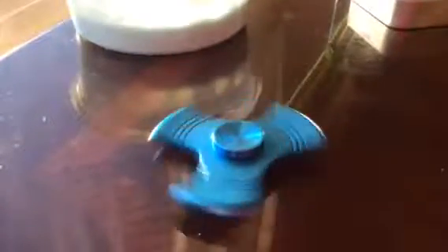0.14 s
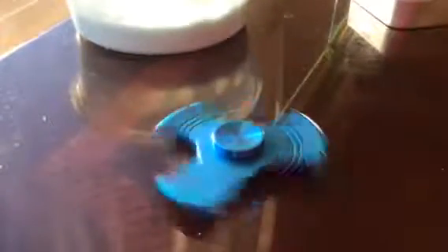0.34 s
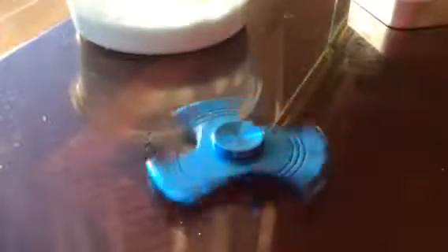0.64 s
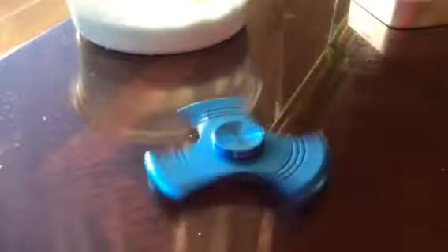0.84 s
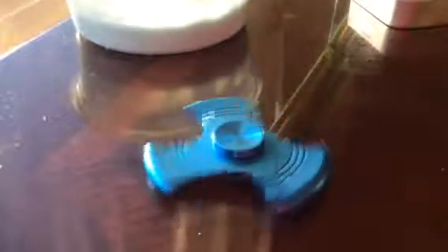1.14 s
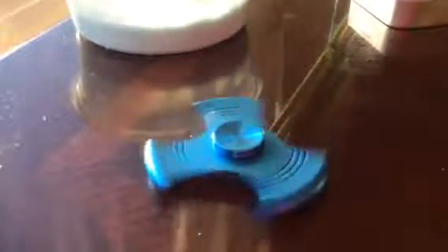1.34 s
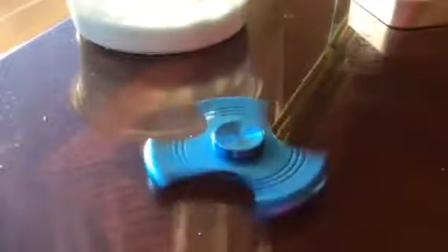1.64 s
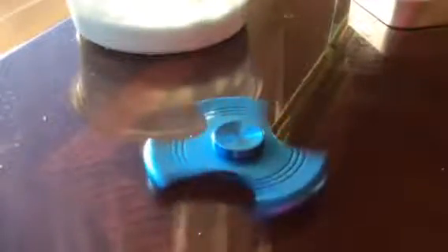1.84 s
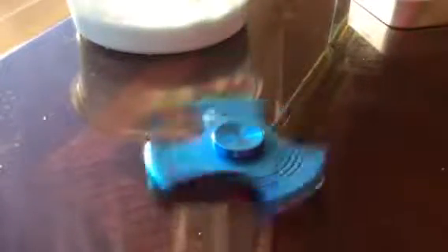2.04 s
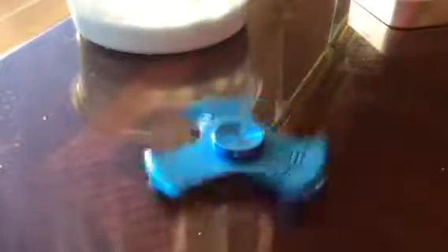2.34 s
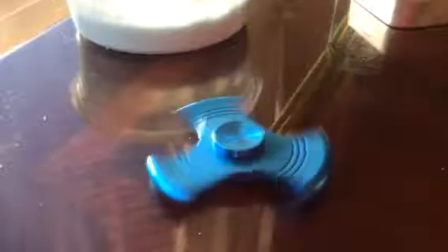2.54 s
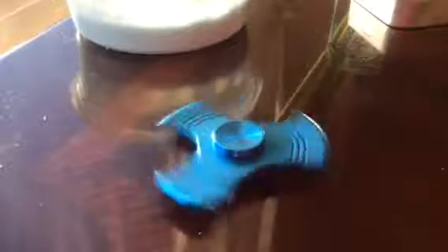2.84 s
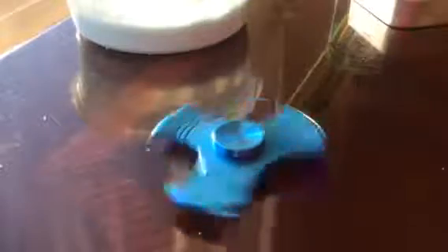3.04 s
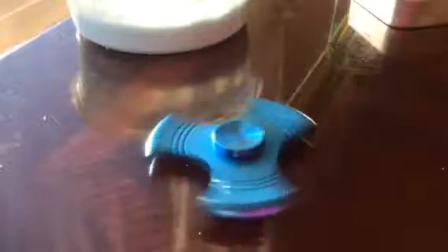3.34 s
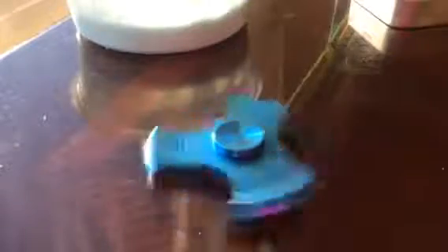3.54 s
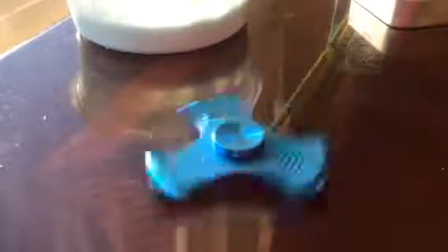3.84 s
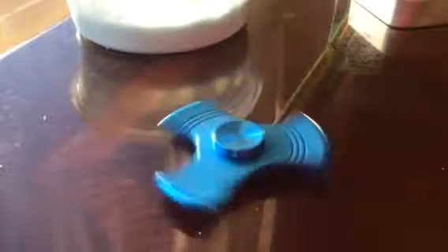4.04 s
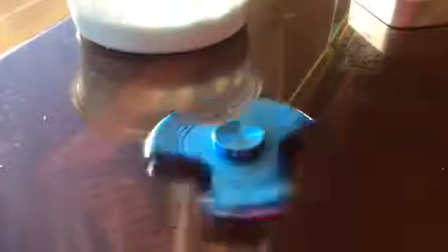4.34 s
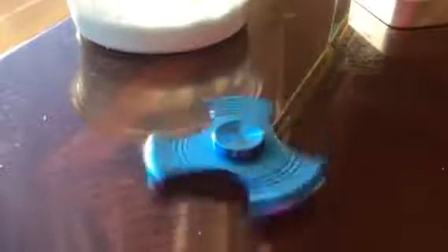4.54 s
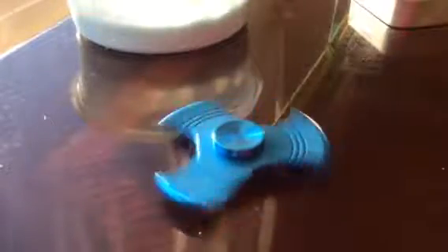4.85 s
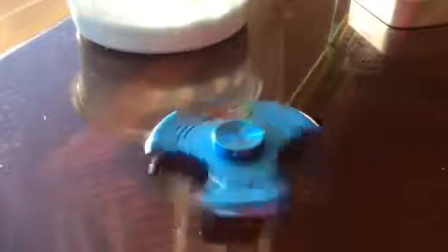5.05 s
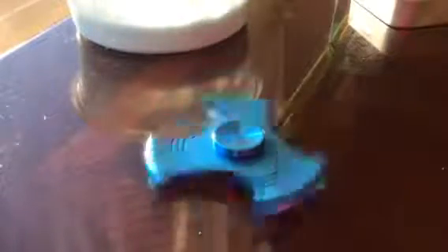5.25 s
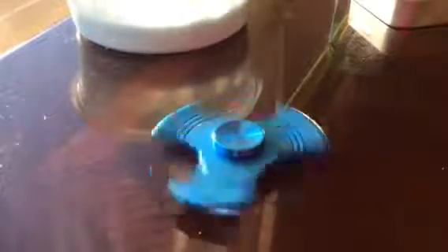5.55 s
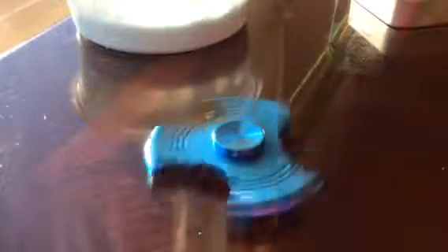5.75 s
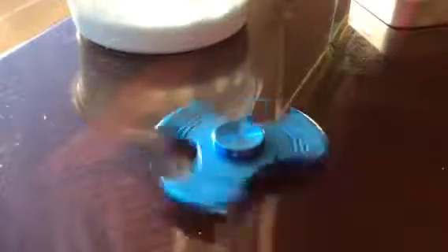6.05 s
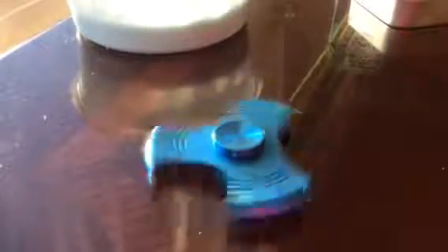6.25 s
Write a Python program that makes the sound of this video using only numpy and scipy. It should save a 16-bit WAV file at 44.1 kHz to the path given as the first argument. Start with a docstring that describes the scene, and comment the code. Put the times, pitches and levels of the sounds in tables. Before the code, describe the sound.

Already spinning from the start, a metal fidget toy rumbles and purrs on a tabletop beside a phone microphone. Rapid soft taps merge into a rough buzzing flutter, varied by wobble, uneven woody knocks and brief tonal hums. Faint metallic hiss and dry specks of grit colour the top. Pitch and level sink very gradually; soft brushing appears near the end. Small quiet indoor room, slight short echo.

```python
"""A three-armed metal fidget spinner coasts on a table, close to a phone in a quiet room.
Random ball contacts drive its resonances: rumble through hub and table top, hiss in the steel races.
The loose rotor wobbles, eases off the balls and knocks: light tips each turn, listed hard blows.
Noise bursts make crunching grit and dust; brief hums, soft rustles and steady room hush lie around it."""
import sys
import numpy as np
from scipy import signal
from scipy.fft import rfft, irfft
from scipy.io import wavfile
from scipy.ndimage import uniform_filter1d, map_coordinates

SR = 44100
rng = np.random.default_rng(int(sys.argv[2]) if len(sys.argv) > 2 else 0)


def pcm_store(signal):
    """Save signal as 16-bit PCM."""
    levels = np.round(np.clip(np.atleast_2d(signal), -1, 1) * 32767)
    wavfile.write(sys.argv[1], SR, levels.astype(np.int16).T)


N = 282181
TAPS = 8192
TIME = np.arange(N) / SR
FREQS = np.arange(TAPS // 2 + 1) * SR / TAPS

# resonances of the spinner standing on the table top: [f/Hz, -6 dB width/Hz, relative level/dB]
BODY_MODES = [(319, 18, -18), (353, 22.3, -14), (381.5, 28, -16), (422, 26, -14), (483.2, 42.6, -10),
              (519.6, 20, -11.5), (580.4, 42, -2.5), (620.3, 71.4, 1), (682, 69, 0.54), (743.7, 59, 1.5),
              (776, 59, -8.5)]
# resonances of steel races and cap: [f/Hz, -6 dB width/Hz, relative level/dB]
STEEL_MODES = [(2467, 190, -8), (2704, 145, -4), (3120, 220, -5.5), (3500, 240, -4), (3977, 350, -7.5),
               (4370, 130, -9.5), (4880, 340, -3.5), (5250, 180, -4), (5850, 200, -2.5), (6100, 150, -6.5),
               (6456, 220, -0.5), (6700, 186, 3), (6944, 490, 0), (7550, 980, -9), (8160, 370, -4.5),
               (9100, 2200, -13), (11700, 4000, -18), (14800, 1800, -19)]
# hard rotor knocks, levels ahead of the play limit; only a negative lull counts:
# [t/s, ring/dB, thud/dB, load lull before it/dB]
HARD_KNOCKS = [(0.096, -36.5, -41, 0), (0.148, -43, -48, -5), (0.179, -45, -49, -10), (0.24, -51, -44.5, 0),
               (0.394, -36.5, -35.5, 0), (0.562, -54, -48, -19), (0.612, -34.5, -41.5, 0),
               (0.636, -48, -48, 0), (0.672, -60, -41.5, 0), (0.785, -39, -64, 0), (0.983, -55, -39.5, 0),
               (1.045, -54, -44, 0), (1.266, -59, -42, 0), (1.547, -37.5, -43, 0), (1.58, -45, -40, 0),
               (1.64, -41, -54, -12), (1.738, -45, -45, 0), (1.895, -35.5, -39.5, 0),
               (1.962, -36, -38.5, -1), (2.027, -38, -40, -5), (2.09, -44, -38.5, 0), (2.101, -39, -64, 2),
               (2.214, -36, -46.5, -1), (2.261, -41, -51, -24), (2.312, -47, -43, -1),
               (2.411, -35.5, -42, -1), (2.446, -38, -56, -2), (2.512, -37, -47, 0),
               (2.543, -37.5, -46, -16), (2.704, -48, -39, -18.5), (2.815, -43, -47, -6),
               (2.868, -42.5, -39, 0), (2.931, -33.5, -37, 0), (3.162, -33.5, -36, -2),
               (3.28, -36.5, -42.5, 0), (3.392, -49, -40, 0), (3.406, -40.5, -58, 0), (3.423, -60, -47, 0),
               (3.456, -39, -40, 0), (3.807, -44, -46, 0), (3.912, -40, -46, -14), (3.926, -35.5, -45, 0),
               (4.022, -35, -53, -8), (4.072, -36.5, -57, 0), (4.157, -43, -45, -9), (4.295, -40, -55, -6),
               (4.478, -37.5, -55, 0), (4.557, -31, -40.5, -6), (4.62, -47, -44, 0), (4.663, -48, -43, 0),
               (4.733, -36, -45, 0), (4.903, -35.5, -39, 0), (4.946, -38, -58, -6), (5.075, -61, -40, 0),
               (5.089, -30, -58, -4.5), (5.139, -43, -46, -7), (5.175, -48, -43, 0), (5.283, -39.5, -55, 0),
               (5.316, -38, -40, -9.5), (5.494, -37.5, -43, -8), (5.729, -38, -43, -12),
               (5.763, -48, -44, 0), (6.079, -38, -46, 0), (6.225, -45, -38, -8), (6.292, -38, -52, -4)]


def undb(db):
    """Decibels to gain."""
    return 10 ** (np.asarray(db) / 20)


def unit(x):
    """Scale to rms 1."""
    return x / np.sqrt(np.mean(x ** 2))


def curve(rows):
    """Join (s, value) rows by straight lines."""
    return np.interp(TIME, *np.transpose(rows))


def through(x, response):
    """Pass a signal through an impulse response."""
    return signal.oaconvolve(x, response)[:N]


def causal(gain):
    """Minimum-phase impulse response with the given gain over FREQS: it rings only after the blow."""
    cepstrum = irfft(np.log(gain + 1e-6))
    cepstrum[1:TAPS // 2] *= 2
    cepstrum[TAPS // 2 + 1:] = 0
    return irfft(np.exp(rfft(cepstrum)))


def resonances(modes):
    """Gain over FREQS of (f/Hz, width/Hz, level/dB) resonances, summed in power."""
    power = 0
    for hz, width_hz, db in modes:
        gain = undb(db) / (1 + (2 * (FREQS - hz) / width_hz) ** 2)
        power = power + gain ** 2
    return np.sqrt(power)


def radiated(modes):
    """Gain over FREQS of modes in air; the table top gives out little below its lowest mode."""
    table_cut_hz = 310
    return resonances(modes) * (FREQS ** 6 / (FREQS ** 6 + table_cut_hz ** 6))


def struck(modes, contact_hz):
    """Ring after one blow, peak 1; a soft contact weakens what lies above contact_hz."""
    ring = causal(radiated(modes) / (1 + (FREQS / contact_hz) ** 6))
    return ring / np.abs(ring).max()


def blows(times, sizes):
    """Single impulses at the given times."""
    samples = np.clip(np.asarray(times) * SR, 0, N - 1).astype(int)
    return np.bincount(samples, sizes, N)


def contacts(rate, spread_db):
    """Dense random impacts of uneven size and either sign, rate a second, rms 1."""
    hits = rng.random(N) < rate / SR
    signs = rng.choice([-1, 1], N)
    return unit(hits * signs * undb(spread_db * rng.standard_normal(N)))


def swell(at, length):
    """A smooth cos^2 rise and fall centred on a moment."""
    out = np.zeros(N)
    first, last = np.searchsorted(TIME, [at - length / 2, at + length / 2])
    out[first:last] = np.cos(np.pi * (TIME[first:last] - at) / length) ** 2
    return out


def wander(rate):
    """Smoothed chance with rate fresh values a second, rms 1."""
    hold = int(SR / rate)
    steps = rng.standard_normal(N)[np.arange(N) // hold]
    return unit(uniform_filter1d(steps, hold))


def drifting(x):
    """Contact stiffness varies by chance: a wandering delay drifts the pitch."""
    drift_share, drift_per_s = 0.013, 14  # rms share of the pitch
    lag_s = drift_share * wander(drift_per_s) / (np.sqrt(3) * drift_per_s)
    return map_coordinates(x, [(TIME - lag_s) * SR], mode="mirror")


def air():
    """The steady hush of the room: filtered noise."""
    level_db = -67.5  # rms
    # spectrum of the hush: [f/Hz, relative density/dB]
    air_spectrum = [(20, -44), (38, -9), (54, 1), (70, -3.5), (105, -2), (170, -5.5), (280, -2.5),
                    (600, -7.5), (1500, -9), (3000, -28.5), (5500, -24.5), (9000, -25.5), (15000, -38)]
    hz, db = np.transpose(air_spectrum)
    gain = undb(np.interp(np.log(FREQS + 1), np.log(hz), db))
    return undb(level_db) * unit(through(rng.standard_normal(N), causal(gain)))


def room(x, t60, wet_db):
    """Weak diffuse wall echoes: a decaying noise tail after 6 ms."""
    tail = rng.standard_normal(N) * undb(-60 * TIME / t60) * (TIME > .006)
    return x + undb(wet_db) * through(x, tail / np.linalg.norm(tail))


def rustles():
    """Short, soft, grainy brushing: resonant grains with a ragged level."""
    # [t/s of the middle, length/s, f/Hz, -6 dB width/Hz, level/dB before the swell]
    brushes = [(6.016, 0.11, 7300, 15000, -70), (6.004, 0.012, 7000, 12000, -68),
               (6.024, 0.02, 4200, 7000, -65), (6.038, .011, 10000, 13000, -69),
               (6.045, .09, 11300, 1200, -83), (6.359, 0.022, 10400, 5500, -66),
               (6.371, 0.015, 3750, 2540, -72), (6.373, 0.012, 12100, 6000, -61.5)]
    out = 0
    for at, length_s, hz, width_hz, db in brushes:
        grains = through(contacts(rate=5000, spread_db=3), causal(resonances([(hz, width_hz, 0)])))
        ragged = undb(3 * wander(500))
        out = out + undb(db) * swell(at, length_s) * unit(grains * ragged)
    return out


def hums():
    """A few pure tones swell and fade beside the whir."""
    # levels ahead of the play limit: [t/s of the middle, length/s, f/Hz, peak level/dB]
    tones = [(0.918, 0.14, 198, -63.5), (1.053, 0.13, 489, -51.5), (1.108, 0.032, 753, -42),
             (1.39, 0.19, 485, -49), (1.466, 0.12, 730.5, -42), (1.712, 0.14, 487, -54.5),
             (2.778, 0.062, 723, -41), (4.843, 0.057, 632, -42.5), (4.979, 0.029, 628, -40),
             (6.302, .035, 634, -47.5)]
    out = 0
    for at, length_s, hz, db in tones:
        out = out + undb(db) * swell(at, length_s) * np.sin(2 * np.pi * hz * TIME)
    return out


def dust():
    """Fine specks crackle faintly throughout: decaying bursts of steel-coloured noise."""
    chance = rng.standard_normal((300, 1))
    times = rng.uniform(0, TIME[-1], len(chance))
    specks = blows(times, undb(-75.5 + 0.88 * chance[:, 0]))
    crumble = through(specks, np.exp(-TIME[:TAPS] / 0.0033))
    return crumble * unit(through(rng.standard_normal(N), struck(STEEL_MODES, contact_hz=5400)))


def grit():
    """Specks of grit under the balls are crushed, crumble within milliseconds and ring the steel."""
    crush_s, crumble_s = 0.002, 0.005
    # loudest crunches: [t/s, peak level/dB, f/Hz of the emphasis]
    crunches = [(0.129, -59, 3590), (0.2757, -61, 3350), (0.297, -61.5, 2650), (0.4249, -63, 3100),
                (0.566, -68, 3500), (0.712, -59, 4000), (0.859, -55.5, 4770), (0.967, -67, 3500),
                (1.306, -60, 3600), (1.393, -65, 3500), (1.451, -61, 3800), (1.608, -62.5, 3600),
                (1.906, -58, 4400), (2.0617, -59.5, 3130), (2.358, -61.5, 4200), (2.659, -62.5, 3170),
                (2.812, -58, 5000), (2.935, -60.5, 4010), (3.435, -59, 4860), (3.893, -64, 3600),
                (4.025, -67, 3600), (4.0624, -58, 3300), (4.713, -62, 3500), (4.866, -63, 3500),
                (5.181, -66, 5200), (5.299, -60.5, 4800), (5.35, -63, 3500), (5.523, -62, 3530),
                (5.68, -62, 3600), (6.174, -61.5, 3450), (6.341, -58.5, 3030)]
    out = np.zeros(N + TAPS)
    steel = resonances(STEEL_MODES)
    shape = (1 - np.exp(-TIME[:TAPS] / crush_s)) * np.exp(-TIME[:TAPS] / crumble_s)
    for at, db, hz in crunches:
        ring = causal(steel * resonances([(hz, 5500, 0)]))
        tick = signal.fftconvolve(rng.standard_normal(TAPS) * shape, ring)[:TAPS]
        start = int(at * SR)
        out[start:start + TAPS] += undb(db) * tick / np.abs(tick).max()
    return out[:N]


def chatter():
    """The steel races buzz at each hard thud: noise that dies away exponentially."""
    re_thud_db, decay_s = -38, 0.009
    at, _, thud_db, _ = np.transpose(HARD_KNOCKS)
    buzz = through(blows(at, undb(thud_db + re_thud_db)), np.exp(-TIME[:TAPS] / decay_s))
    return buzz * unit(through(rng.standard_normal(N), struck(STEEL_MODES, contact_hz=5000)))


def clatter(turns):
    """Balls jostle in their cage and ring hub and arms; the level wavers and sinks with time."""
    start_db, fade_db_per_s = -65, 0.31
    wander_db, wander_per_s = 1.05, 50
    # resonances of hub and arms: [f/Hz, -6 dB width/Hz, relative level/dB]
    hub_modes = [(1010, 70, -7.5), (1076, 46, 0), (1170, 98, -4.5), (1276, 73, -9), (1414, 47, -0.5),
                 (1466, 58, -2), (1507, 110, -9), (1749, 106, -5.5), (1972, 56, -12), (2106, 58, -14),
                 (2277, 130, -14.5)]
    jostle = undb(1.4 * np.cos(2 * np.pi * turns)) * contacts(rate=1100, spread_db=3)
    level_db = start_db - fade_db_per_s * TIME + wander_db * wander(wander_per_s)
    return unit(drifting(through(jostle, causal(resonances(hub_modes))))) * undb(level_db)


def hiss(turns):
    """Fine race roughness rings the steel, pulsing twice a turn; strongest at first, then settling."""
    settled_db, extra_db, settle_s = -77.5, 5, 3.3
    wander_db, wander_per_s = 0.5, 16
    fine = undb(0.66 * np.cos(4 * np.pi * turns)) * contacts(rate=7000, spread_db=3.5)
    level_db = settled_db + extra_db * np.exp(-TIME / settle_s) + wander_db * wander(wander_per_s)
    return unit(through(fine, causal(resonances(STEEL_MODES)))) * undb(level_db)


def knocking(turns):
    """The rotor tips against its play once a turn, now and then hard: table thud and body ring."""
    tip_lead_turns, tip_jitter_s = 0.1072, 0.00197  # lead before each full turn ends
    tip_db, tip_cage_db, tip_spread_db = -50, 3, 3  # mean, swing as the ball cage goes round, chance
    cage_per_turn, cage_heavy_turn = .4236, 1.23
    ring_above_hz = 550  # modes of the spinner itself
    whole = np.arange(1, turns[-1])
    times = np.interp(whole - tip_lead_turns, turns, TIME)
    chance = rng.standard_normal((len(times), 2))
    cage = np.cos(2 * np.pi * cage_per_turn * (whole - cage_heavy_turn))
    at, ring_db, thud_db, _ = np.transpose(HARD_KNOCKS)
    # no light tip within 8 ms of a hard knock
    free = np.abs(times[:, None] - at).min(axis=1) > .008
    light_db = tip_db + tip_cage_db * cage + tip_spread_db * chance[:, 1]
    light = blows(times + tip_jitter_s * chance[:, 0], free * undb(light_db))
    thud = through(light + blows(at, undb(thud_db)), struck(BODY_MODES, contact_hz=400.0))
    spinner_modes = [mode for mode in BODY_MODES if mode[0] > ring_above_hz]
    ring = through(blows(at, undb(ring_db)), struck(spinner_modes, contact_hz=1030))
    return thud + ring


def strands(turns):
    """Race waviness draws wavering tones whose pitch follows the rotor speed."""
    waver_per_s = 14
    # levels before bearing load, fade and play limit: [cycles per turn, rms level/dB]
    waviness = [(19.3, -64.5), (21.4, -57.5), (23.4, -57.5), (37.1, -79.5)]
    out = 0
    for cycles, db in waviness:
        phase = 2 * np.pi * cycles * turns
        tone = wander(waver_per_s) * np.cos(phase) + wander(waver_per_s) * np.sin(phase)
        out = out + undb(db) * unit(tone)
    return out


def bearing_load(turns):
    """Load on the balls in dB: eases with the wobble, dips before some knocks, surges on landing."""
    wobble_per_turn, first_lift_turn = .2608, 2.55
    lift_db, lift_spread_db, lift_width_turns = -2.5, 2, 0.22
    lull_s, lull_lead_s = 0.028, 0.012  # full length; centre ahead of the knock
    landing_share, landing_s = 0.15, 0.016  # share of the lull in dB; centre after the knock
    wander_db, wander_per_s = 1.04, 50
    wobbles = wobble_per_turn * (turns - first_lift_turn)
    which = np.round(wobbles - np.round(wobbles[0])).astype(int)
    depth_db = np.minimum(lift_db + lift_spread_db * rng.standard_normal(which[-1] + 1), 0)
    from_lift_turns = (wobbles - np.round(wobbles)) / wobble_per_turn
    lift = np.exp(-.5 * (from_lift_turns / lift_width_turns) ** 2)
    lulls_db = landings_db = 0
    for at, _, _, db in HARD_KNOCKS:
        if db < 0:
            lulls_db = lulls_db + db * swell(at - lull_lead_s, lull_s)
            landings_db = landings_db - landing_share * db * swell(at + landing_s, lull_s)
    eased_db = np.minimum(depth_db[which] * lift, lulls_db)
    return eased_db + landings_db + wander_db * wander(wander_per_s)


def rolling(turns):
    """Balls rumble on rough races; the unbalanced rotor varies their load within each turn."""
    rumble_db, fade_db_per_s = -48.5, 0.19  # rms before load and fade
    play_hold = 0.72  # exponent of the swing limit
    ball_cut_hz = 233  # the small balls drive the table less below this
    # contact load through one turn: [share of the turn, level/dB]
    turn_load = [(.02, 1), (.18, -7), (.35, -0.5), (.55, -8), (.72, -2), (.88, -2.5)]
    load_db = np.interp(turns % 1, *np.transpose(turn_load), period=1)
    drive = FREQS ** 2 / np.hypot(FREQS ** 2, ball_cut_hz ** 2)
    pressed = undb(load_db) * contacts(rate=1800, spread_db=1.5)
    rumble = unit(through(pressed, causal(radiated(BODY_MODES) * drive)))
    # the bearing's small play holds back the widest swings
    swing = uniform_filter1d(rumble ** 2, size=260)
    rumble = rumble / (1 + swing / 4) ** play_hold
    whir = unit(drifting(rumble)) * undb(rumble_db) + strands(turns)
    return whir * undb(bearing_load(turns) - fade_db_per_s * TIME)


def play(x):
    """The rotor swings only as far as its play allows: short-term rms is held near a limit."""
    limit_db = -38.5
    swing = uniform_filter1d(x ** 2, size=130) / undb(limit_db) ** 2
    return x / (1 + swing ** 3) ** (1 / 6)


def scene():
    """The slowing spinner in its room."""
    # rotor speed: [t/s, f/Hz in turns per second]
    speed = [(0, 32.83), (1.3, 31.81), (3.1, 30.45), (5, 29.2), (6.4, 28.24)]
    turns = np.cumsum(curve(speed)) / SR
    rotor = play(rolling(turns) + knocking(turns) + hums())
    bearing = hiss(turns) + clatter(turns) + chatter()
    near = rotor + bearing + grit() + dust() + rustles()
    return (room(near, t60=0.33, wet_db=-16.5) + air())[None]


def record(dry):
    """The phone cuts off the top of the treble: steep elliptic low-pass."""
    top_hz = 15300
    return signal.sosfilt(signal.ellip(10, .1, 70, top_hz, fs=SR, output="sos"), dry)


dry = scene()
out = record(dry)
pcm_store(out)
```